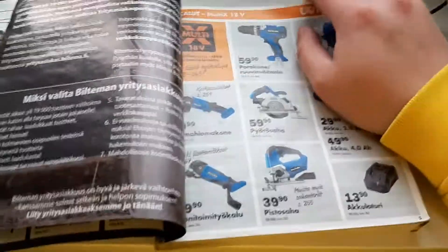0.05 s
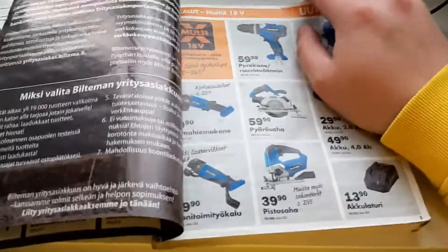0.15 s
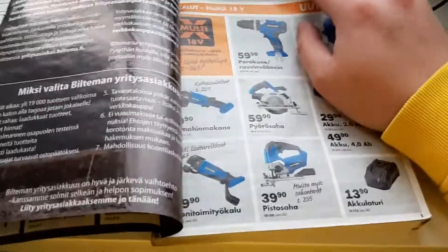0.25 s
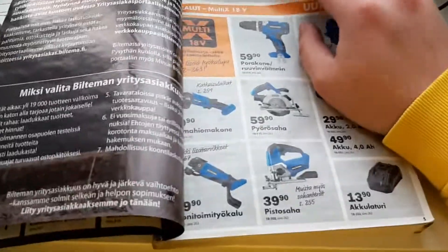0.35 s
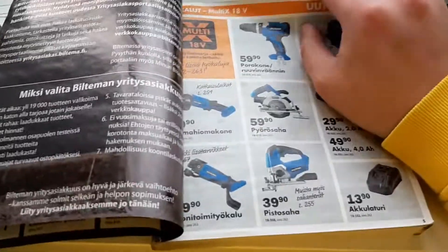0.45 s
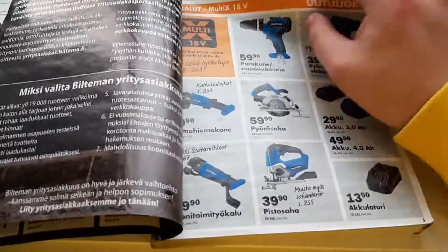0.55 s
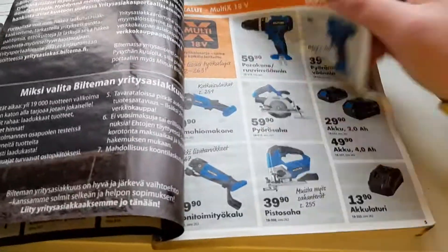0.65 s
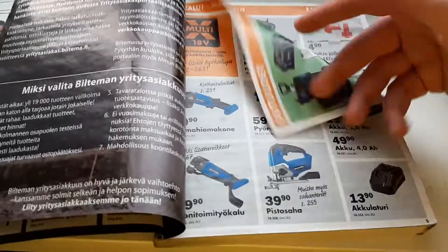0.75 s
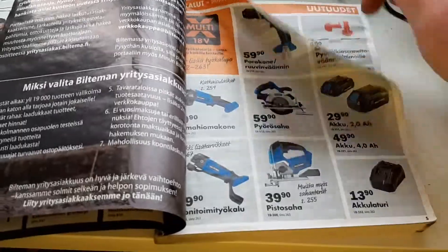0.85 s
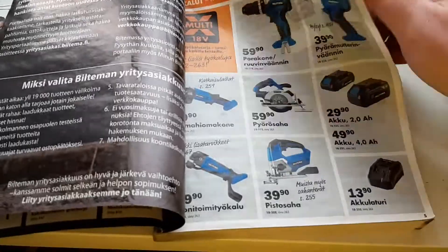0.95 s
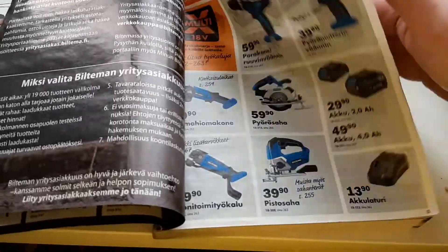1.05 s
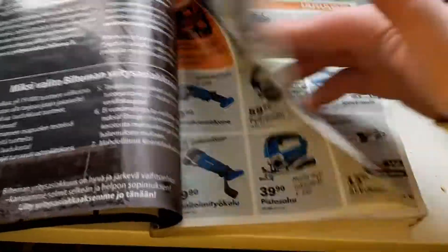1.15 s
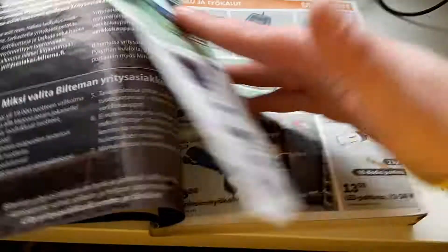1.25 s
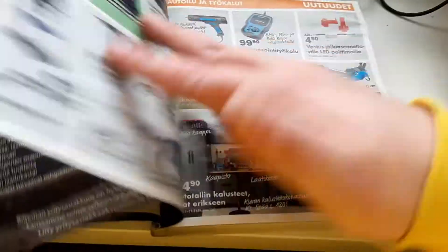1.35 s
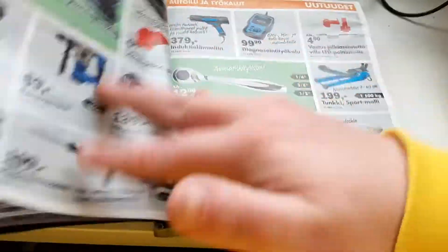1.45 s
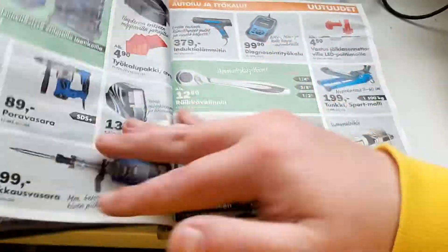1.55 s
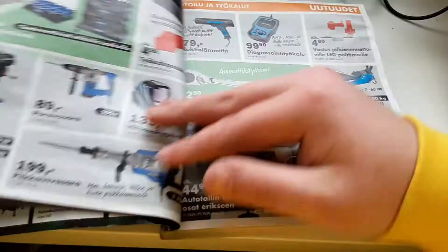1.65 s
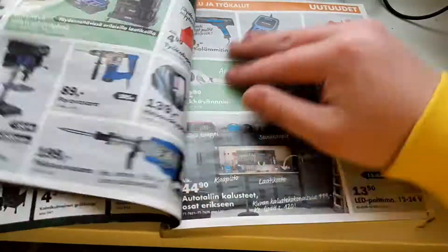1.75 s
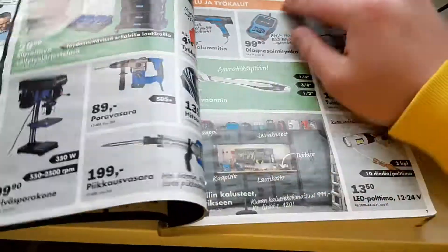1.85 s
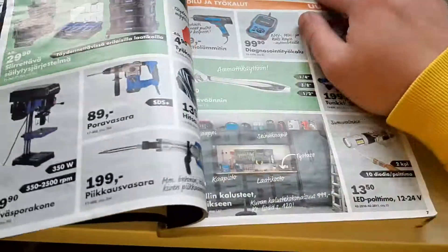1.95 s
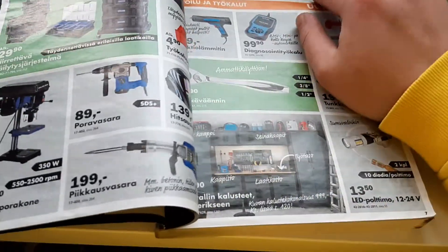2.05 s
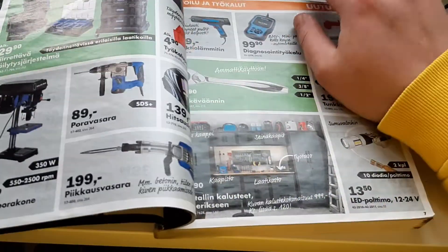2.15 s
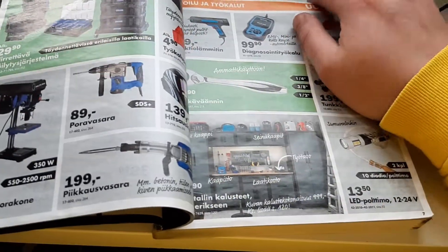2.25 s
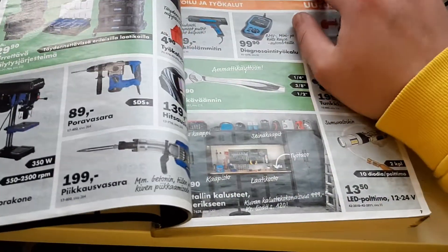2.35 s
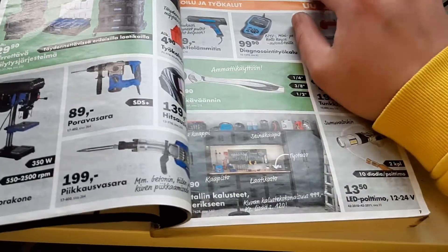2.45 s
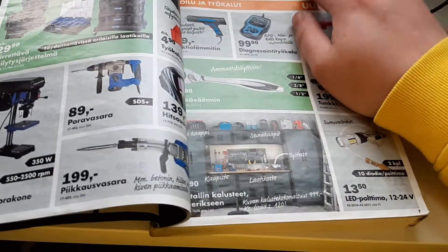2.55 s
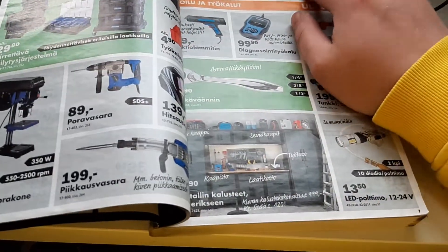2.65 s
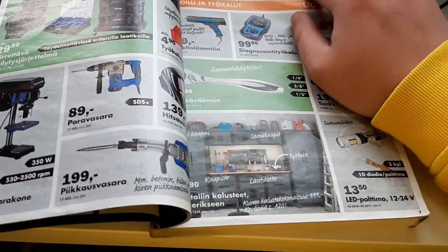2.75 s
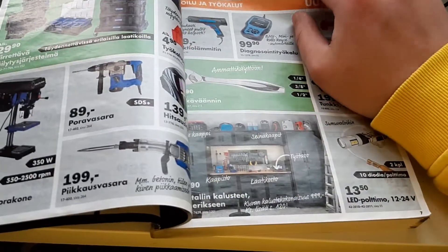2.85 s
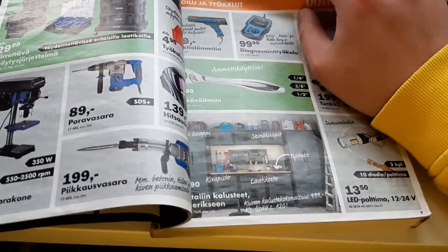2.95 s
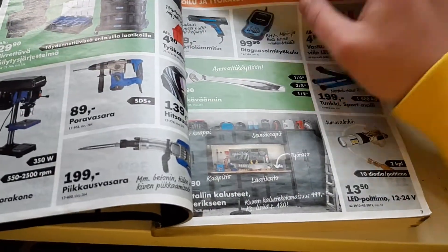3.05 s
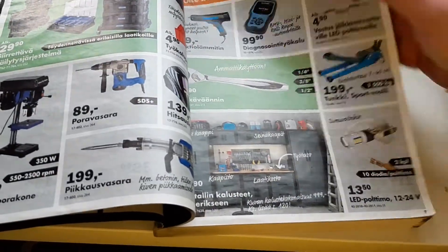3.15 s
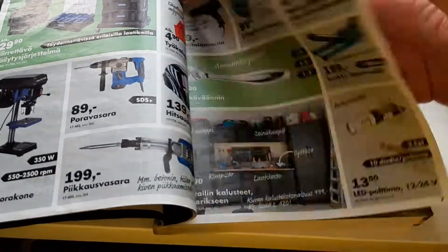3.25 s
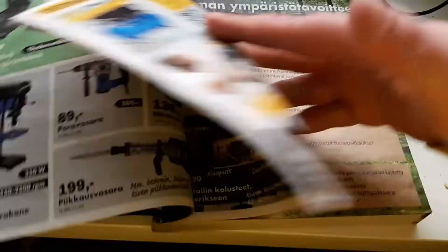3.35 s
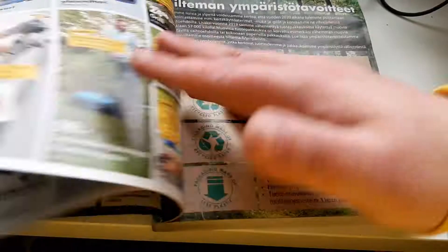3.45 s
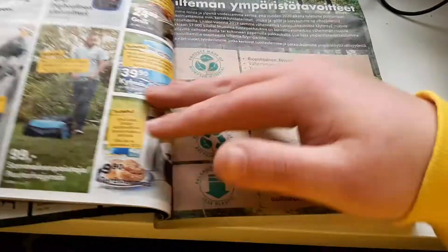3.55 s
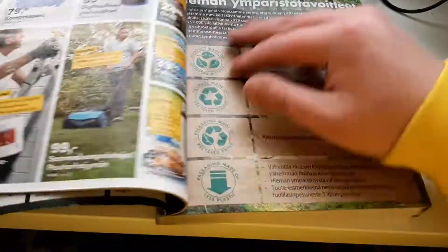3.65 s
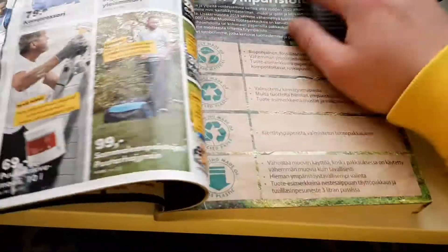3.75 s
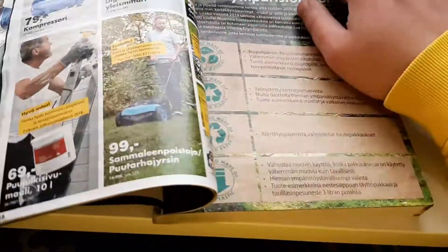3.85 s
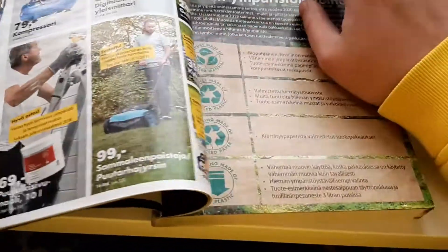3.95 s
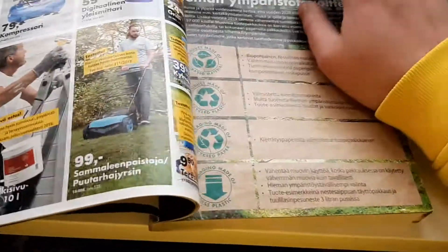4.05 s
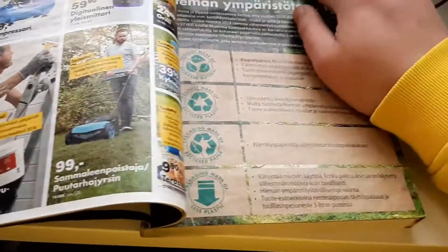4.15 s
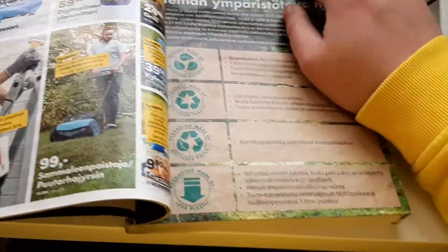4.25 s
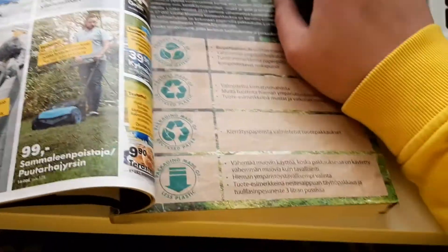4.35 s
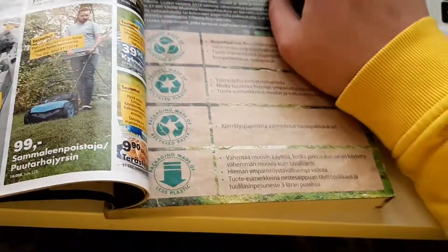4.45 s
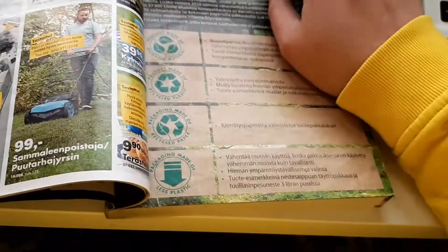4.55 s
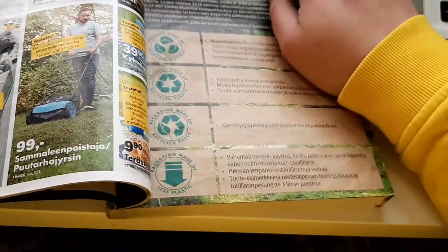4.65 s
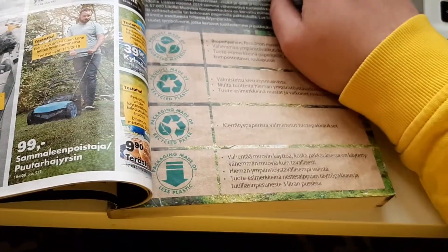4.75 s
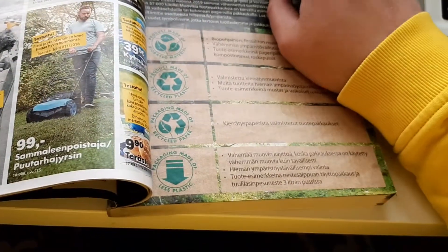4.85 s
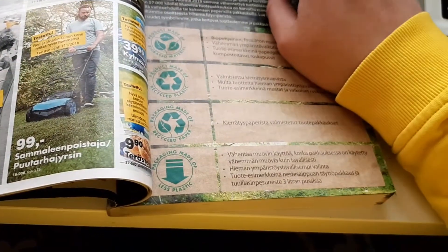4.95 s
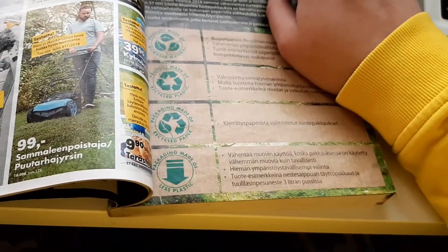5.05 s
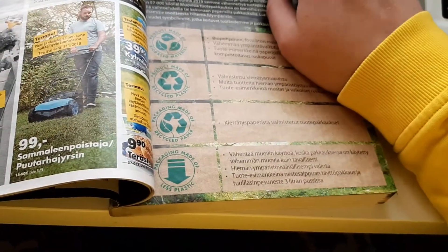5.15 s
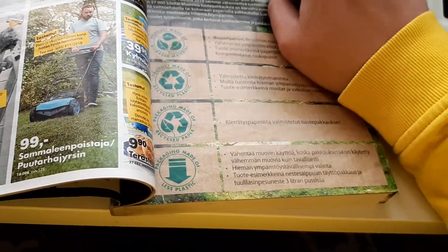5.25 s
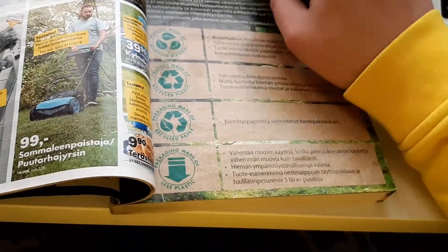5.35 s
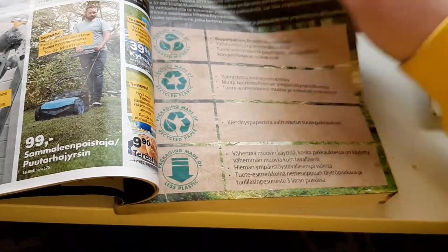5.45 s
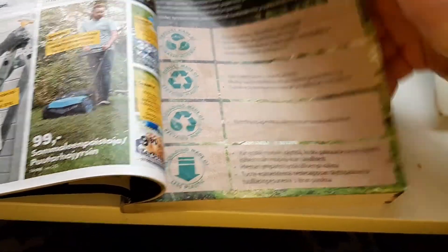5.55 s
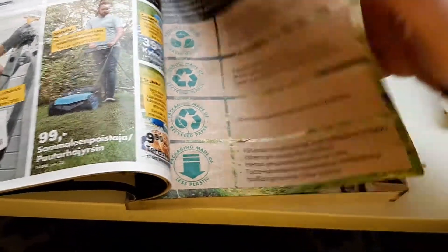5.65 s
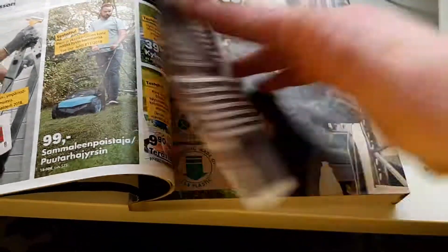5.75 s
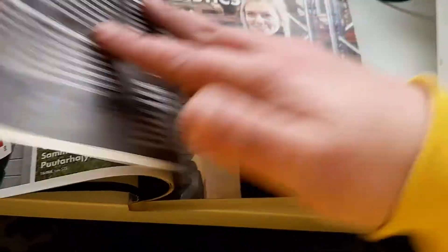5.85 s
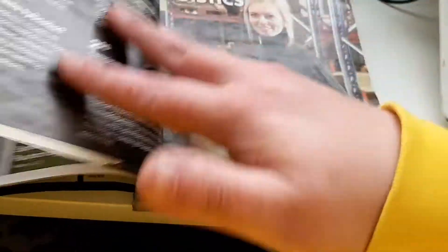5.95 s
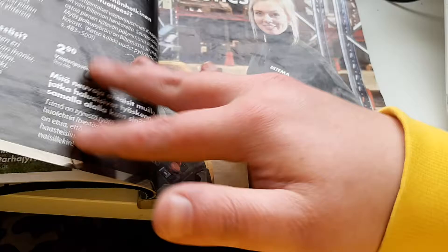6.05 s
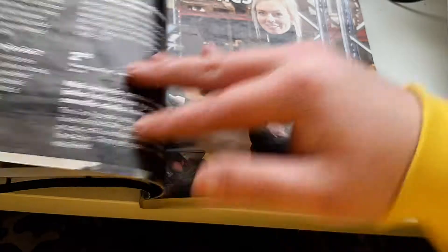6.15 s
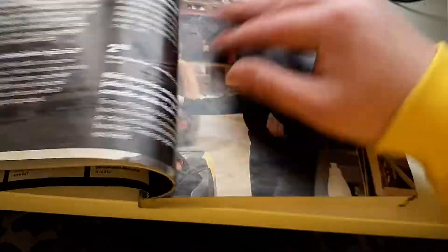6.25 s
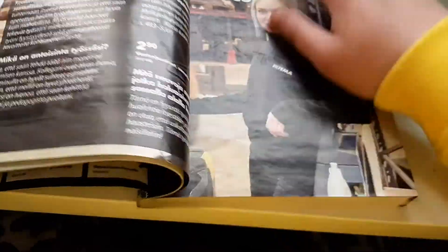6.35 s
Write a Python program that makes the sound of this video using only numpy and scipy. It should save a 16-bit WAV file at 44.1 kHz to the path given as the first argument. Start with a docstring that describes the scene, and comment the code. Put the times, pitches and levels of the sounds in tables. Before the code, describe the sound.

Close, stereo sound of thin glossy catalogue pages turned by hand on a desk. The first turn is longest and loudest, crackling at the corner, then flapping and pressed flat with bright snaps. After a pause a softer, quicker turn follows, then light finger rubs and a third crackly turn. Faint fan hum and soft hiss lie behind.

```python
"""Three thin pages of a thick catalogue are turned by hand on a desk, close to two microphones.
Sharp snaps of the buckling sheet are short noise bursts with a brief ring; rustle and slides are crackling noise.
Tugs and landings are swells of denser crackle, soft blows are damped notes, and moved air is low rumbling noise.
Behind them a quiet room has a low fan hum made of sine waves, and a soft hiss of coloured noise."""
import sys
import numpy as np
from scipy import signal
from scipy.fft import rfft, irfft
from scipy.io import wavfile
from scipy.ndimage import uniform_filter1d

SR = 44100
rng = np.random.default_rng(int(sys.argv[2]) if len(sys.argv) > 2 else 0)


def dump(signal):
    """Clip the signal to [-1, 1] and save it as 16-bit WAV at the path in sys.argv[1]."""
    limited = np.clip(np.atleast_2d(signal).T, -1, 1)
    pcm = np.round(limited * 32767).astype(np.int16)
    wavfile.write(sys.argv[1], SR, pcm)


N = 282240
T = np.arange(N) / SR  # time of each sample, s

# Levels in the tables are settings to be balanced, coloured and mixed further on.
# A side_db is left minus right, so a positive one leans left.

# Room hiss spectrum: pitch_hz, relative_db
HISS = [(35, -43), (58, -14), (150, -12.5), (260, -11.5), (400, -13.5), (560, -15), (950, -19.5),
        (2000, -14), (2900, -18.5), (4400, -14), (6600, -20.5), (7700, -31.5), (9500, -31), (16000, -41.5)]
# Left-right balance of the hiss: pitch_hz, side_db
HISS_SIDE = [(60, 6), (110, 5), (200, 1.5), (380, -2), (700, -1.5), (1290, 3.5), (2380, 3), (4400, 0.0),
             (8120, -4), (15000, -3)]
# How alike the hiss is left and right: pitch_hz, likeness (1 = same, 0 = unrelated, negative = opposed)
HISS_LIKENESS = [(60, 1), (130, 0.91), (400, 0.6), (700, -0.08), (1400, -0.3), (3100, -0.086),
                 (7000, 0.022)]
# Hiss loudness over time: time_s, level_db
HISS_LEVEL = [(0, -47.5), (0.6, -46), (1.6, -45), (1.9, -50), (2.7, -51.5), (3.3, -42), (4.0, -47),
              (5.4, -46), (5.8, -45.5), (6.4, -46.5)]
# Sine waves of the fan: pitch_hz (at speed 1), level_db
FAN_LINES = [(59, -90), (166.6, -58.5), (333, -70.5), (356, -73.5), (398, -70.5), (436, -73), (592, -77.5)]
# Drift of the fan's pitch: time_s, speed_factor
FAN_SPEED = [(0, 1.006), (1.2, 1.023), (2.3, 1), (3.3, 1.014), (3.8, 1), (4.3, 1.01), (5.3, 1.02),
             (6.4, 1.02)]
# Rise and fall of the fan's loudness: time_s, gain_db
FAN_LEVEL = [(0, 1), (0.7, 5.5), (1.4, 4), (2.1, 0), (2.8, 1), (3.5, 4.5), (4.4, 3), (6.4, 1.5)]
# Loudness of a second, lower hum: time_s, level_db
DRONE_LEVEL = [(0, -60.5), (1.6, -69), (2.8, -69.5), (3.7, -64.5), (4.3, -62), (5.6, -59.5), (6.4, -59.5)]
DRONE_HZ = 125.3  # middle of its wavering pitch
# How fast the room's echo tail dies: pitch_hz, t60_s (time to fall 60 dB)
ROOM = [(150, 0.91), (1000, 0.1), (4000, 0.19), (9000, 0.21), (16000, 0.16)]
# Air moved by the page and the sleeve, one table per sweep of the arm: time_s, level_db
DRAUGHT = [
    [(0.1, -72), (0.256, -47.5), (0.31, -65), (0.388, -46.5), (0.42, -56.5), (1.198, -47.5), (1.294, -57),
     (1.344, -48), (1.414, -49), (1.45, -62), (1.69, -62), (1.75, -73)],
    [(2.9, -65), (2.954, -66), (2.996, -70.5), (3.06, -52), (3.326, -58), (3.346, -68), (3.4, -47),
     (3.462, -60), (3.698, -64), (3.732, -53), (3.81, -74), (3.85, -63)],
]
# Soft blows of hand and page on the book: start_s, level_db, pitch_hz, t60_s
THUMPS = [(.38, -45, 85, .09), (1.008, -32, 118, .084), (1.185, -41, 112, .09), (1.738, -37, 310, 0.049),
          (1.738, -25, 947, 0.05), (2.562, -40, 122, 0.065), (2.561, -37.5, 285, 0.035),
          (5.687, -28.5, 473, 0.025), (6.324, -37.5, 99, .18), (6.329, -41, 250, .08)]
# Spectrum of the flexing sheet: pitch_hz, relative_db
RUSTLE = [(100, -17.5), (250, -14), (500, -6.5), (750, -11), (950, -12), (1250, -10.5), (1650, -9),
          (2200, -4.5), (3000, -8.5), (4200, -9.5), (6000, -6.5), (7600, -20.5), (16000, -45)]
# Spectrum of paper sliding: pitch_hz, relative_db
SLIDE = [(500, -47), (2500, -13), (5000, -6.5), (6500, -2), (7700, -8), (9000, -6.5), (11000, -7),
         (13500, -8), (16000, -11)]
# Spectrum of the body of a buckle: pitch_hz, relative_db
SNAP = [(120, -21), (400, -7), (700, -14), (950, -7.5), (1300, -18.5), (1850, -3), (2400, -1.5), (3400, -5),
        (4800, -7), (6200, 1.5), (7600, -12.5), (16000, -38)]
# Spectrum of sharp treble: pitch_hz, relative_db
CRACK = [(2000, -32), (5000, 12), (6300, 4), (7600, 5), (8800, 5.5), (11500, 1), (16000, -3.5)]
# Spectrum of the whole sheet flapping: pitch_hz, relative_db
FLAP = [(110, -16.5), (260, 2), (420, -4.5), (600, 4.5), (930, -5), (1400, -6), (4000, -28)]
# Left-right balance of all paper sounds: pitch_hz, side_db
PAPER_SIDE = [(200, -11.5), (600, -11), (1000, -3), (1500, 5), (2200, 8.5), (3200, 0), (4200, -3),
              (6000, -15.5), (7600, -15.5), (10000, -5.5), (15000, -6.5)]
# The sheet lands or is pressed flat: peak_s, rise_s, fall_s, body_db
LANDINGS = [(1.486, 0.07, 0.029, -24.5), (1.742, 0.0096, .017, -16), (3.492, 0.015, 0.029, -27.5),
            (5.808, 0.0052, .014, -29), (5.912, 0.0099, 0.036, -31)]
# The sheet is tugged off its neighbour: peak_s, rise_s, fall_s, body_db, hiss_db
TUGS = [(.673, 0.022, 0.018, -28, -41), (.726, 0.032, 0.019, -26.5, -28),
        (.808, 0.0061, 0.0057, -31.5, -30), (.972, 0.0094, 0.028, -32, -40.5),
        (1.068, 0.014, .022, -27, -46), (1.116, 0.015, 0.012, -22, -43), (5.46, 0.012, 0.031, -26.5, -40.5),
        (5.555, 0.0054, .008, -34, -28), (5.595, 0.019, 0.054, -24, -41), (5.685, 0.0053, 0.03, -30, -44)]
# Fingers slide over the paper: peak_s, length_s (fall time), hiss_db, rustle_db (sheet under them)
RUBS = [(0.566, 0.083, -49.5, -44.5), (0.787, 0.07, -55, -38), (1.608, .02, -51, -33),
        (1.73, 0.092, -37, -33.5), (2.32, 0.064, -60, -70), (2.67, 0.037, -57, -54),
        (2.767, 0.007, -50.5, -50), (3.068, 0.074, -52.5, -46.5), (3.166, 0.028, -48, -45),
        (3.382, 0.049, -34, -38.5), (3.73, 0.061, -43.5, -51.5), (3.967, 0.14, -55, -57),
        (4.832, 0.034, -49, -46.5), (4.98, 0.029, -49, -45.5), (5.09, .04, -54, -56),
        (5.236, .05, -53.5, -55), (6.175, .05, -50, -43), (6.334, 0.045, -45, -54)]
RUB_RISE_SHARE = 0.85  # rise time as a share of the fall time
# One row a page: lifted_s, laid_down_s, flexing_rustle_db, sliding_hiss_db
TURNS = [(0.958, 1.48, -36.5, -43.5), (3.117, 3.483, -46, -46), (5.444, 5.939, -37.5, -44.5)]
# The clear buckles of the sheet: time_s, level_db, treble_db (relative to level_db), ring_hz
SNAPS = [(0.3367, -25.5, -5.5, 2140), (0.5117, -16.5, -12, 2240), (.6818, -18.5, -15, 2320),
         (.7023, -20, -11, 2600), (0.7174, -13, -16, 2460), (0.734, -10.5, -6, 2880),
         (0.7382, -18.5, 3, 2730), (0.8988, -29, -33, 2900), (1.069, -14, -17.5, 2330),
         (1.11, -19, -26, 2350), (1.1227, -16.5, -32, 2870), (1.2133, -24, -14, 2700),
         (1.387, -21, -28, 2020), (1.4301, -20.5, -22, 2370), (1.4913, -13.5, -10, 3560),
         (1.5885, -27, -10, 2600), (1.699, -15.5, -9, 2070), (1.7066, -10, -15, 1965),
         (1.725, -12, -4, 2420), (1.7343, -10, -5, 2080), (1.7385, -9, -10, 3380),
         (2.9262, -32, -2.5, 1860), (3.0254, -27, -11, 2380), (3.0323, -23.5, -17, 1970),
         (3.241, -34, -22, 2100), (3.4765, -26, -23, 3300), (3.4865, -18, -6.5, 3170),
         (3.6652, -31, -10, 3380), (5.0794, -29.5, -18, 2080), (5.112, -31, -12.5, 1840),
         (5.2769, -21.5, -10.5, 2110), (5.2886, -31.5, -8, 2330), (5.3324, -32.5, -9, 2470),
         (5.3606, -30.5, -18, 1930), (5.4843, -13.5, -11, 2630), (5.527, -22, -9.5, 2400),
         (5.5623, -15.5, -24, 2130), (5.5844, -6, -22, 2305), (5.5877, -11, -29, 2190),
         (5.6865, -20.5, -28, 2130), (5.7109, -15, -35, 2440), (5.8338, -22.5, -13, 2090),
         (5.8691, -14.5, -24, 2847), (6.132, -35, -20, 1903), (6.17, -34, -22, 1880)]

LIFT_S, CROSS_S, RETURN_S = 0.013, 0.4, 0.6  # the sheet gets moving, crosses to the left; the hand comes back
RUSTLE_SWELL_DB, HISS_SWELL_DB = 3.5, 3.5  # growth from lift to landing
SETTLE_DB_PER_S, HISS_FADE_DB_PER_S = 80, 45  # dying away after the landing
# Left-right balance at the corner, and how much further left it goes as the sheet crosses
CORNER_SIDE_DB, RUSTLE_SWING_DB, SNAP_SWING_DB = 8, 9, 15.5
# Small chance buckles: level relative to the rustle, its spread either way, treble, middle ring pitch
CREASE_DB, CREASE_SPREAD_DB, CREASE_TREBLE_DB, CREASE_HZ = 6.5, 3, -13, 2250
# Length of a usual buckle; one stronger by the doubling step lasts twice as long
SNAP_T60_S, USUAL_SNAP_DB, SNAP_DOUBLING_DB = 0.014, -20, 44.5
EDGE_HZ = 16100  # upper limit of the sound


def from_db(db):
    """Turns decibels into gain."""
    return 10 ** (np.asarray(db) / 20)


def unit(x):
    """Scales a signal to an average strength (rms) of 1."""
    return x / np.sqrt(np.mean(x ** 2) + 1e-20)


def at_hz(points, hz):
    """Reads a table between its points, with pitch spaced in octaves."""
    f, value = np.transpose(points)
    return np.interp(np.log(hz + 1), np.log(f), value)


def level_curve(s, db):
    """Gain along a level curve, fading to silence outside it."""
    inside = 1.0 * ((T >= s[0]) & (T <= s[-1]))
    return from_db(np.interp(T, s, db)) * uniform_filter1d(inside, size=1500)


def sides(db):
    """Left and right gains for a left-right difference, keeping the total power the same."""
    gains = np.array([from_db(db / 2), from_db(-db / 2)]).reshape(2, -1)
    return gains / np.sqrt(np.mean(gains ** 2, axis=0))


def add(mix, s, sound):
    """Mixes a stereo sound in at time s."""
    part = mix[:, max(round(s * SR), 0):][:, :sound.shape[1]]
    part += sound[:, :part.shape[1]]


def colour(x, spectrum, side=None, size=2048):
    """Filters stereo sound to a spectrum and left-right balance, without sounding ahead of its input."""
    hz = np.abs(np.fft.fftfreq(size, 1 / SR))
    gain = from_db(at_hz(spectrum, hz)) * sides(at_hz(side, hz) if side else 0 * hz)
    # minimum phase: the filter answers as early as it can
    response = np.exp(np.conj(signal.hilbert(np.log(gain), axis=1)))
    taps = np.fft.ifft(response, axis=1).real
    taps /= np.sqrt(np.sum(taps ** 2) / 2)
    return signal.oaconvolve(x, taps, axes=1)[:, :N]


def pair(a, b, likeness):
    """Makes two partly alike channels from two unrelated signals."""
    c = np.clip(likeness, -1, 1)
    return np.array([a, c * a + np.sqrt(1 - c ** 2) * b])


def wander(rate_hz):
    """Slow random drift: noise with its quick changes removed, scaled to rms 1."""
    hz = np.fft.rfftfreq(N, 1 / SR)
    slow = rfft(rng.standard_normal(N)) / (1 + (hz / rate_hz) ** 4)
    return unit(irfft(slow, N))


def swell(s, rise, fall):
    """The force of one stroke: builds up to time s, then dies away."""
    before, after = np.minimum(T - s, 0), np.maximum(T - s, 0)
    return np.exp(-(before / rise) ** 2 - after / fall)


def travel(t):
    """Where the paper sounds: 0 at the starting corner, towards 1 as the sheet crosses left, then back."""
    place = 0
    for lift, land, _, _ in TURNS:
        crossing = np.clip((t - lift) / CROSS_S, 0, 1)
        returning = np.clip(1 - (t - land) / RETURN_S, 0, 1)
        place = place + crossing * returning
    return place


def crackle(per_s, spread_db, grain_s, smooth, likeness):
    """Fibres catch and slip: tiny noise bursts of uneven size over a smooth rub."""
    sizes = from_db(spread_db * np.minimum(rng.exponential(1, N), 4)) ** 2
    slips = (rng.random(N) < per_s / SR) * sizes
    power = signal.lfilter([1], [1, -np.exp(-1 / (grain_s * SR))], slips)
    power = power / power.mean() + smooth
    power /= uniform_filter1d(power, size=2200)  # keeps the slower loudness even
    return np.sqrt(power) * pair(*rng.standard_normal((2, N)), likeness)


def restless(x, depth_db, patch_hz, patch_s):
    """The bending sheet keeps changing which of its modes speak: drifting patches of colour."""
    z = signal.stft(x, SR, nperseg=512, noverlap=384)[2]
    hz = np.fft.fftfreq(z.shape[1], SR / 512)[:, None]
    t = np.fft.fftfreq(z.shape[2], 128 / SR)
    blur = np.exp(-(hz * patch_hz) ** 2 - (t * patch_s) ** 2)
    patches = np.fft.ifft2(np.fft.fft2(rng.standard_normal(z.shape[1:])) * blur).real
    gain = unit(from_db(depth_db * unit(patches)))
    return signal.istft(z * gain, SR, nperseg=512, noverlap=384)[1][:, :N]


def background(hiss_db=-2):
    """Soft room hiss: coloured noise, most alike left and right in the bass."""
    hz = np.fft.rfftfreq(N, 1 / SR)
    noise = rfft(rng.standard_normal((2, N)))
    air = irfft(pair(*noise, at_hz(HISS_LIKENESS, hz)), N)
    return colour(air, HISS, HISS_SIDE) * from_db(hiss_db + np.interp(T, *np.transpose(HISS_LEVEL)))


def hum(waver=0.0024, side_db=-3):
    """The drifting steady notes of a fan, and a lower hum that swells beside them."""
    speed = np.interp(T, *np.transpose(FAN_SPEED)) + waver * wander(11.5)
    turned = np.cumsum(speed) / SR
    fan = sum(from_db(db) * np.sin(2 * np.pi * hz * turned) for hz, db in FAN_LINES)
    drone = np.sin(2 * np.pi * DRONE_HZ * np.cumsum(1 + waver * wander(6.9)) / SR)
    fan_gain = from_db(np.interp(T, *np.transpose(FAN_LEVEL)))
    drone_gain = from_db(np.interp(T, *np.transpose(DRONE_LEVEL)))
    return np.sqrt(2) * sides(side_db) * (fan_gain * fan + drone_gain * drone)


def room(x, near_db=-13, near_s=0.014, tail_db=-15):
    """Quick reflections from the desk and walls, then a short tail dying at its own rate in each band."""
    t = np.arange(SR // 2) / SR
    shape = (2, 2, len(t))
    near, far = rng.standard_normal(shape) * (rng.random(shape) < 3000 / SR)
    near = near * (t > 0.002) * np.exp(-t / near_s)
    hz, when, z = signal.stft(far * (t > 0.008), SR, nperseg=256)
    decay = from_db(-60 * when / at_hz(ROOM, hz)[:, None])
    far = signal.istft(z * decay, SR, nperseg=256)[1][:, :len(t)]
    echoes = (from_db(near_db) * unit(near) + from_db(tail_db) * unit(far)) / np.sqrt(len(t))
    sent = 1.01 * x + 0.55 * x[::-1]  # some of each side reaches the other
    return x + signal.fftconvolve(sent, echoes, axes=1)[:, :N]


def close_ports(x, corner_hz=650, share=0.78):
    """Low notes reach both close microphones nearly alike, so the low end narrows."""
    lowpass = signal.butter(2, corner_hz, fs=SR, output="sos")
    low_side = signal.sosfiltfilt(lowpass, (x - x[::-1]) / 2)
    return x - share * low_side


def draught(db=2, side_db=-15, low_hz=48, high_hz=135, gust_db=3.0, gusts_hz=9):
    """Moved air buffets the two microphones separately, mostly the right one: gusty low noise."""
    band = signal.butter(3, [low_hz, high_hz], "band", fs=SR, output="sos")
    eddies = signal.sosfilt(band, rng.standard_normal((2, N)))
    eddies /= np.sqrt(uniform_filter1d(eddies ** 2, size=3000, axis=1) + 1e-12)  # even out
    gusts = from_db(db + gust_db * wander(gusts_hz))
    sweeps = sum(level_curve(*np.transpose(rows)) for rows in DRAUGHT)
    return gusts * sides(side_db) * eddies * sweeps


def thumps(rise_cycles=0.63, side_db=-3):
    """The stack of pages answers a soft blow with a damped note."""
    out, t = np.zeros((2, N)), np.arange(SR // 4) / SR
    for s, db, hz, t60 in THUMPS:
        onset = 1 - np.exp(-(t * hz / rise_cycles) ** 2)
        note = from_db(db - 60 * t / t60) * onset * np.sin(2 * np.pi * hz * t)
        add(out, s, sides(side_db) * note)
    return out


def scuffs(rows, centre_hz, broad_share, flap_db, swing_db, spread_db, hiss_side_db=4, flap_side_db=2,
           sharpness=1.31, flap_likeness=0.94):
    """Swells of dense crackle, pitched by the sheet's free length; a lifted sheet also flaps as a whole."""
    grain = crackle(per_s=1000, spread_db=spread_db, grain_s=0.0008, smooth=0.5, likeness=0.2)
    grain = restless(grain, depth_db=2, patch_hz=700, patch_s=0.02)
    force, drag = np.zeros((2, N))
    for s, rise, fall, db, hiss_db in rows:
        stroke = swell(s, rise, fall)
        force += from_db(db) * stroke
        drag += from_db(hiss_db) * stroke
    tuned = signal.lfilter(*signal.iirpeak(centre_hz, sharpness, SR), grain)
    body = sides(CORNER_SIDE_DB + swing_db * travel(T)) * force * (tuned + broad_share * grain)
    hiss = sides(hiss_side_db) * drag * grain
    flap_noise = pair(*rng.standard_normal((2, N)), flap_likeness)
    flap = from_db(flap_db) * force * sides(flap_side_db) * flap_noise
    return colour(body, RUSTLE, PAPER_SIDE) + colour(hiss, CRACK, PAPER_SIDE) + colour(flap, FLAP, PAPER_SIDE)


def landings(hiss_db=-25):
    """A sheet lying down scuffs brighter and finer, and hardly flaps."""
    rows = [(s, rise, fall, db, db + hiss_db) for s, rise, fall, db in LANDINGS]
    return scuffs(rows, centre_hz=3920, broad_share=0.38, flap_db=-24.5, swing_db=7.5, spread_db=0.0)


def tugs():
    """A long free sheet scuffs low and flaps."""
    return scuffs(TUGS, centre_hz=2850, broad_share=0.43, flap_db=-16.5, swing_db=4, spread_db=3.0)


def turning(rustle_db=-1, slide_db=0):
    """The flexing sheet crackles in its middle range, while paper sliding on paper or skin hisses."""
    flex, slide = np.zeros((2, N))
    for lift, land, flex_db, hiss_db in TURNS:
        moving = np.clip((T - lift) / LIFT_S, 0, 1)
        to_go = np.clip((land - T) / (land - lift), 0, 1)
        since = np.maximum(T - land, 0)
        flex += moving * from_db(flex_db - RUSTLE_SWELL_DB * to_go - SETTLE_DB_PER_S * since)
        slide += moving * from_db(hiss_db - HISS_SWELL_DB * to_go - HISS_FADE_DB_PER_S * since)
    for s, length, hiss_db, flex_db in RUBS:
        stroke = swell(s, RUB_RISE_SHARE * length, length)
        flex = np.hypot(flex, from_db(flex_db) * stroke)  # powers add
        slide = np.hypot(slide, from_db(hiss_db) * stroke)
    place = sides(CORNER_SIDE_DB + RUSTLE_SWING_DB * travel(T))
    fibres = crackle(per_s=600, spread_db=5.5, grain_s=0.0045, smooth=0.33, likeness=0.07)
    flex = place * flex * restless(fibres, depth_db=1.8, patch_hz=700, patch_s=0.012)
    rub = crackle(per_s=2600, spread_db=4.5, grain_s=0.0013, smooth=0.57, likeness=0.09)
    slide = place * slide * rub
    rustle = from_db(rustle_db) * colour(flex, RUSTLE, PAPER_SIDE)
    return rustle + from_db(slide_db) * colour(slide, SLIDE, PAPER_SIDE)


def creases(count=7):
    """Small buckles at chance moments while a sheet is in the air, as rows like those of SNAPS."""
    rows = []
    for lift, land, rustle_db, _ in TURNS:
        for when, size, pitch in rng.random((count, 3)):
            s = lift + when * (land - lift)
            db = rustle_db + CREASE_DB + CREASE_SPREAD_DB * (2 * size - 1)
            rows.append((s, db, CREASE_TREBLE_DB, CREASE_HZ * 2 ** (pitch - 0.5)))
    return rows


def snaps(body_db=-3.5, crack_db=4, ring_share=0.24, ring_life=0.82, rise_share=0.1, crack_life=0.88,
          likeness=0.09):
    """Each buckle is a quick run of slips that builds and dies; the bent patch rings briefly at its own pitch."""
    body, crack, t = np.zeros((2, N)), np.zeros((2, N)), np.arange(3000) / SR
    for s, db, treble_db, hz in SNAPS + creases():
        a, b, c, d = rng.standard_normal((4, len(t)))
        life = SNAP_T60_S * 2 ** ((db - USUAL_SNAP_DB) / SNAP_DOUBLING_DB)
        rise = rise_share * life
        shape = (1 - np.exp(-(t / rise) ** 2)) * np.exp(-np.log(1000) * t / life)
        shape /= shape.max()
        run = unit(pair(a, b, likeness) * shape)
        tone = np.sin(2 * np.pi * (hz * t + rng.random((2, 1))))
        ring = unit(tone * shape ** (1 / ring_life))
        place = sides(CORNER_SIDE_DB + SNAP_SWING_DB * travel(s))
        size = from_db(db) * place * np.sqrt(np.mean(shape ** 2))
        add(body, s - rise / 2, size * (run + ring_share * ring))
        # the sharpest slips come first, so the treble dies sooner
        sharp = unit(pair(c, d, likeness) * shape ** (1 / crack_life))
        add(crack, s - rise / 2, size * from_db(treble_db) * sharp)
    low = from_db(body_db) * colour(body, SNAP, PAPER_SIDE)
    return low + from_db(crack_db) * colour(crack, CRACK, PAPER_SIDE)


def scene():
    """Paper in the room, moved air and the background."""
    paper = room(snaps() + turning() + tugs() + landings() + thumps())
    return close_ports(paper) + draught() + background() + hum()


def record(dry):
    """Rounds off peaks softly near full scale, then removes what lies above the upper limit."""
    lowpass = signal.firwin(511, EDGE_HZ, window=("kaiser", 9), fs=SR)
    return signal.oaconvolve(np.tanh(dry), lowpass[None], "same")


dry = scene()
out = record(dry)
dump(out)
```